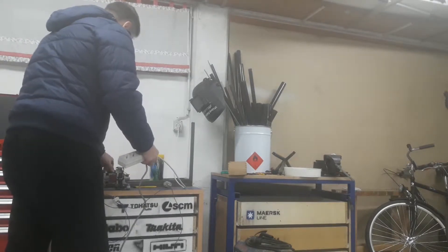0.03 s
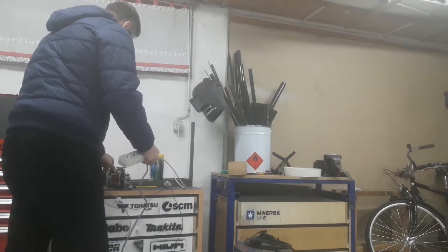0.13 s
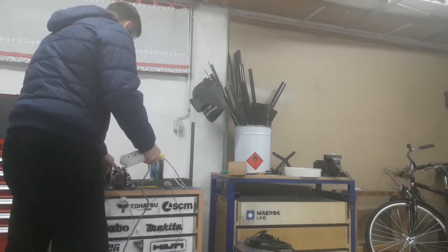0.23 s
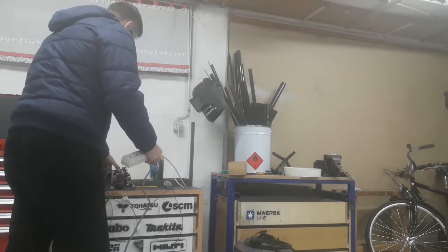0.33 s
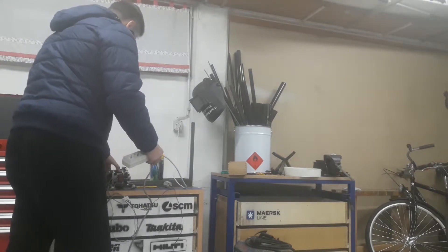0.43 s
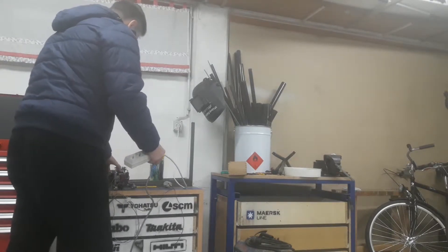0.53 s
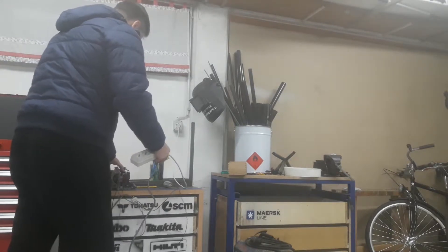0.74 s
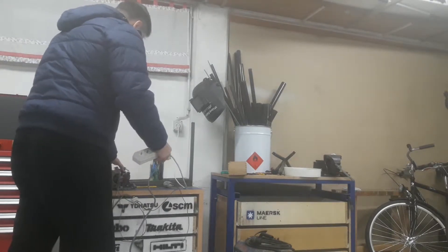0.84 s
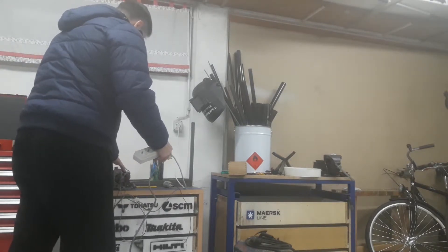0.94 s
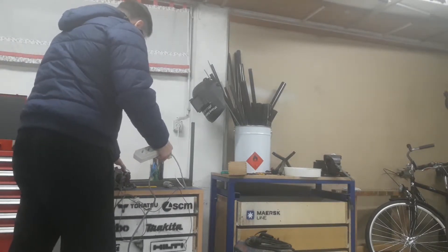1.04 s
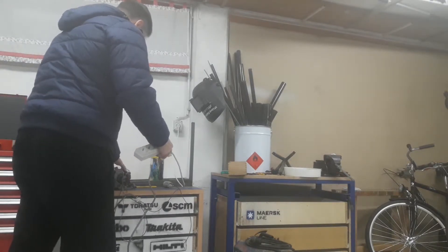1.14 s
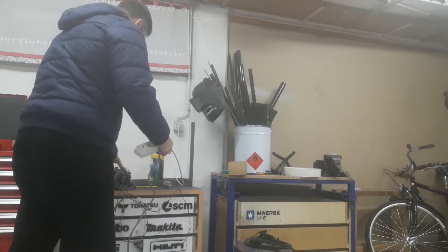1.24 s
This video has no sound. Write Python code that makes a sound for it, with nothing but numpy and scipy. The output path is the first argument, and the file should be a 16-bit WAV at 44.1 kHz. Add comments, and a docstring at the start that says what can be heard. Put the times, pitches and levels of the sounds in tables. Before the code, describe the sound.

A heavy thud on a metal workshop bench is the main sound. From quiet room tone, a low, rough sliding rumble builds at 0.2 seconds. Around 0.35 seconds it lands in four rapid blows, setting metal panels clanging and booming. They shudder with soft bumps, fading by about 1 second in the hard room. A faint tink comes at 0.8 seconds, and two light scrapes around 1.1 and 1.2.

```python
"""Out of quiet room tone comes a low, rough rumble: something heavy slides and bumps in a workshop.
It lands with a thud, four quick blows that set metal panels clanging and booming.
The loose panels shudder on with a few soft bumps while the hard room dies away.
Handling adds small ticks, a faint tink and two scrapes. Sliding, shudder and scrapes are
showers of tiny contacts, the clatter is fading noise, and the ringing is decaying panel modes."""
import sys
import numpy as np
from scipy import signal
from scipy.fft import rfft, irfft
from scipy.io import wavfile
from scipy.ndimage import uniform_filter1d

SR = 44100
rng = np.random.default_rng(int(sys.argv[2]) if len(sys.argv) > 2 else 0)


def inscribe(sig):
    """Save sig as 16-bit PCM at rate SR to the path in sys.argv[1].

    A 1-D sig is mono; a 2-D sig holds one channel per row.
    Samples are clipped to [-1, 1] before scaling.
    """
    pcm = np.round(np.clip(np.atleast_2d(sig).T, -1, 1) * 32767)
    wavfile.write(sys.argv[1], SR, pcm.astype(np.int16))


N = 57330
BIN_HZ = np.maximum(np.arange(N // 2 + 1) * SR / N, 1)


def undb(db):
    return 10 ** (np.asarray(db) / 20)


def unit(x):
    """Scale to rms 1."""
    return x / np.sqrt(np.mean(x ** 2))


def since(start_s):
    """Seconds since a moment, zero before it."""
    return np.maximum(np.arange(N) / SR - start_s, 0)


def over_hz(points, hz):
    """Read (Hz, value) points on a log-frequency axis."""
    freqs, values = np.array(points, float).T
    return np.interp(np.log(np.maximum(hz, 1)), np.log(freqs), values)


def colour(x, eq, tilt_db=0):
    """EQ a signal, tilt it in dB per octave around 500 Hz and roll off the sub-bass; rms 1."""
    octaves = np.clip(np.log2(BIN_HZ / 500), -2, 2)
    low_cut = BIN_HZ ** 2 / (BIN_HZ ** 2 + 25 ** 2)
    return unit(irfft(rfft(x) * low_cut * undb(over_hz(eq, BIN_HZ) + tilt_db * octaves), N))


def noise(eq, tilt_db=0):
    """Coloured noise, rms 1."""
    return colour(rng.standard_normal(N), eq, tilt_db)


def wander(rate_hz):
    """Smooth random drift, spread near 1."""
    hop = int(SR / rate_hz)
    steps = rng.standard_normal(400)
    path = np.interp(np.arange(N) / hop, np.arange(len(steps)), steps)
    return uniform_filter1d(path, hop // 2) * 1.28


def strike(start_s, attack_s, t60):
    """Envelope: quick rise, exponential fall of 60 dB in t60 seconds."""
    age = since(start_s)
    return (1 - np.exp(-age / attack_s)) * np.exp(-np.log(1000) * age / t60)


def grains(eq, per_s, spread_db, smear_s, spots=8):
    """Tiny uneven contacts at several spots, each smeared by its own path through the room."""
    out = np.zeros(N)
    for _ in range(spots):
        hits = rng.random(N) < per_s / spots / SR
        sizes = undb(spread_db * rng.standard_normal(N)) * rng.choice([-1, 1], N)
        tail = rng.standard_normal(N) * np.exp(-since(0) / smear_s)
        out += signal.fftconvolve(hits * sizes, tail)[:N]
    return colour(out, eq)


def ring(modes, start_s, attack_s):
    """Struck metal: its modes waver in level and phase as they fade."""
    out = np.zeros(N)
    for hz, db, t60 in modes:
        waver = 1 + .28 * (wander(25.86) + 1j * wander(25))
        tone = np.imag(waver * np.exp(2j * np.pi * hz * since(start_s)))
        out += undb(db) * strike(start_s, attack_s, t60) * tone
    return out


# A dark bed of air. Each row: frequency in Hz, gain in dB.
ROOM_EQ = [(30, -27), (80, -6), (135, 0), (240, -3), (380, -10), (600, -18), (1200, -15), (2000, -26),
           (4000, -36), (8000, -53), (10500, -46), (15500, -43)]

def room_tone():
    """The workshop's steady, quiet background noise."""
    return undb(-46) * noise(ROOM_EQ)


# The slide's low rumble. Each row: frequency in Hz, gain in dB.
SLIDE_EQ = [(40, -40), (75, -13), (130, 6), (350, 6.5), (600, -2), (1200, -8.5), (2200, -23), (4000, -33.5),
            (8000, -52.5), (15000, -80.5)]

def slide():
    """Rough sliding gathers speed until the first blow stops it."""
    start_s, rise_s, release_s = .168, .13, .047
    speed = np.minimum(since(start_s) / rise_s, 1) * np.exp(-since(FIRST_BLOW_S) / release_s)
    return undb(-25) * speed * grains(SLIDE_EQ, per_s=1300, spread_db=3.5, smear_s=.027)


# Soft bumps around the thud. Each row: start in seconds, level in dB, pitch in Hz.
BUMP_CUES = [(0.179, -32, 319.4), (0.192, -22.5, 149), (0.23, -26.5, 136), (0.244, -29.5, 128),
             (.273, -22.5, 140.6), (0.294, -21, 158), (0.33, -29, 146), (0.406, -21, 83.7),
             (.428, -19, 216), (0.484, -39, 145.5), (0.526, -40, 88), (0.55, -18.5, 148), (0.571, -25, 146),
             (.705, -26.5, 172.6), (.722, -35, 96.5), (0.802, -27, 136.5), (1.184, -29, 144),
             (1.199, -30, 96), (1.274, -37, 152)]
# The dull body under a bump. Each row: frequency in Hz, gain in dB.
BUMP_EQ = [(35, -53), (70, -40.5), (140, -10.5), (220, 6), (350, 4.5), (500, -26.5), (800, -13.5),
           (2000, -58), (6000, -84)]

def bumps():
    """Soft contacts: a dull knock around one low resonance."""
    out = np.zeros(N)
    for start, db, hz in BUMP_CUES:
        tone = np.sin(2 * np.pi * hz * since(start))
        body = undb(-3.5) * noise(BUMP_EQ)
        out += undb(db) * strike(start, attack_s=.003, t60=.2) * (body + tone)
    return out


# The thud's hard blows. Each row: start in seconds, level in dB, treble tilt in dB per octave.
BLOW_CUES = [(.335, -23.5, 2.5), (.354, -19, -.5), (0.378, -20.5, 0.5), (.418, -18.5, -3.5)]
FIRST_BLOW_S, FULL_WEIGHT_S = BLOW_CUES[0][0], BLOW_CUES[1][0]
# The noisy crash of a blow. Each row: frequency in Hz, gain in dB.
CLATTER_EQ = [(30, -42), (55, -23.5), (85, -14), (160, -7), (400, 1), (700, -10.5), (1200, -17),
              (2500, -23), (3700, -26.5), (5500, -36.5), (8300, -60), (10500, -53), (15500, -53.5)]
# Its tail in the hard room. Each row: frequency in Hz, t60 in seconds.
CLATTER_TAIL = [(80, 0.26), (300, 0.73), (1000, 0.95), (3000, 0.83), (6000, 0.67), (12000, 0.33)]

def clatter():
    """Each blow wakes a crowd of resonances; the lows build slowly and the mids hang longest."""
    out = np.zeros(N)
    for start, db, tilt_db in BLOW_CUES:
        spectrum = rfft(panel_colour(noise(CLATTER_EQ, tilt_db)))
        for centre_hz in 31.25 * 2 ** np.arange(10):
            octave_window = np.maximum(1 - abs(np.log2(BIN_HZ / centre_hz)), 0)
            band = irfft(spectrum * octave_window, N)
            attack_s = .002 + 1.5 / centre_hz  # 2 ms plus one and a half cycles
            out += undb(db) * band * strike(start, attack_s, over_hz(CLATTER_TAIL, centre_hz))
    return out


# Hollows in the panels' tone. Each row: centre in Hz, width in Hz, gain in dB.
PANEL_NOTCHES = [(2240, 73, -1.5), (2990, 217, -5), (4170, 390, -6), (4826, 110, -13), (5720, 90, -10)]

def panel_colour(x):
    """The panels gather noise around their clang modes and thin it in the gaps."""
    width_hz, lift_db = 35, 5
    peaks = [(hz, width_hz, lift_db) for hz, _, _ in PANEL_CLANG]
    db = sum(gain * np.exp(-((BIN_HZ - hz) / width) ** 2) for hz, width, gain in peaks + PANEL_NOTCHES)
    return irfft(rfft(x) * undb(db), N)


# The panels' bright modes. Each row: pitch in Hz, level in dB, t60 in seconds.
PANEL_CLANG = [(1091.6, -36.5, 1.2), (1459, -31, 1), (1612, -45.5, 0.79), (1815, -44, 1.6),
               (1990, -43.5, 0.55), (2351, -30.5, 0.72), (2377, -37, 0.59), (2659, -33.5, 0.99),
               (3188, -45.5, 0.5), (3362, -50.5, 0.69), (3632, -39, 0.82), (4260, -52, 0.52),
               (4720, -44.5, 0.39)]

def clang():
    """First contact sets the panels' high modes ringing."""
    return ring(PANEL_CLANG, FIRST_BLOW_S, attack_s=.004)


# The panels' deep modes. Each row: pitch in Hz, level in dB, t60 in seconds.
PANEL_BOOM = [(82.2, -24.5, 0.28), (148.66, -14.5, 0.52), (227.7, -16, 0.85), (276.7, -23.5, .9),
              (357.4, -13, 0.41), (417.5, -34, 1), (463, -25.5, 0.76), (528, -22, 0.2), (639, -25, .8),
              (787, -33, 1), (821, -27.5, 0.33)]

def boom():
    """The full weight follows and drives the panels' low modes."""
    return ring(PANEL_BOOM, FULL_WEIGHT_S, attack_s=.005)


# The shudder's fader ride. Each row: time in seconds, level in dB.
SHUDDER_FADER = [(.40, -55), (.50, -30), (.62, -28.5), (0.731, -27.5), (.83, -34), (.92, -37.5), (1.1, -39),
                 (1.3, -39.5)]
# Its bass-heavy tone. Each row: frequency in Hz, gain in dB.
SHUDDER_EQ = [(35, -31.5), (80, -6.5), (140, 1.5), (200, 0), (260, -1), (400, -2.5), (560, -6), (750, -15),
              (1100, -15), (2000, -27.5), (3600, -30), (5500, -39), (8300, -61.5), (15000, -61)]

def shudder():
    """Loose panels keep rattling after the thud."""
    times, db = np.array(SHUDDER_FADER).T
    level = undb(np.interp(since(0), times, db)) * (since(FIRST_BLOW_S) > 0)
    return level * panel_colour(grains(SHUDDER_EQ, per_s=900, spread_db=1.5, smear_s=.032))


# Small handling ticks. Each row: start in seconds, level in dB, t60 in seconds.
TICK_CUES = [(.583, -59, 0.021), (.588, -65, .35), (.738, -64.5, 0.32), (.814, -57, .08), (.822, -66, 0.08),
             (0.833, -57, 0.23), (1.068, -66, 0.073)]
# Their thin, bright tone. Each row: frequency in Hz, gain in dB.
TICK_EQ = [(1000, -25), (5000, -16), (7000, -11), (7800, -19), (9000, -15), (11000, -8), (15000, -8)]

def ticks():
    """Light touches on metal, each a sharp burst of fading noise."""
    return sum(undb(db) * noise(TICK_EQ) * strike(start, attack_s=.0006, t60=t60)
               for start, db, t60 in TICK_CUES)


# A small part's high modes. Each row: pitch in Hz, level in dB, t60 in seconds.
SMALL_PART_MODES = [(6930, -72, .7), (7060, -71, .6), (12100, -72, .2)]

def tink():
    """A small metal part is touched and rings briefly."""
    return ring(SMALL_PART_MODES, start_s=.813, attack_s=.0011)


# Short handling scrapes. Each row: start in seconds, length in seconds, level in dB.
SCRAPE_CUES = [(1.068, 0.065, -52.5), (1.19, 0.088, -46.5)]
# Low body with a rasp on top. Each row: frequency in Hz, gain in dB.
SCRAPE_EQ = [(200, 10.5), (700, -19), (1200, 3), (2400, -3.5), (4000, -7.5), (6000, -14), (8300, -29.5),
             (11000, -27), (15000, -31)]

def scrapes():
    """Each short push rubs out a run of tiny contacts, with a tail of room."""
    attack_s, release_s = .014, .094
    out = np.zeros(N)
    for start, length, db in SCRAPE_CUES:
        push = np.minimum(since(start) / attack_s, 1) * np.exp(-since(start + length) / release_s)
        out += undb(db) * push * grains(SCRAPE_EQ, per_s=1000, spread_db=3.5, smear_s=.015)
    return out


def scene():
    """The shift, the landing and the handling over room tone, in mono."""
    bed = room_tone()
    shift = slide() + bumps()
    landing = clatter() + clang() + boom() + shudder()
    handling = ticks() + tink() + scrapes()
    return (bed + shift + landing + handling)[None]


def record(dry):
    """The microphone thins the deep bass and the recorder cuts the top steeply."""
    low_hz, top_hz = 50, 15800
    thinned = signal.sosfilt(signal.butter(3, low_hz, "high", fs=SR, output="sos"), dry)
    return signal.sosfilt(signal.ellip(10, .2, 80, top_hz, fs=SR, output="sos"), thinned)


dry = scene()
out = record(dry)
inscribe(out)
```